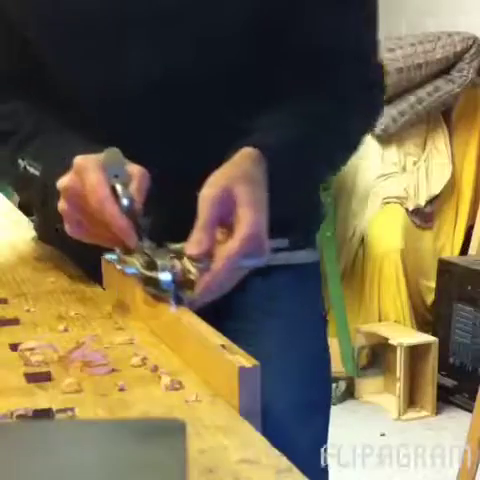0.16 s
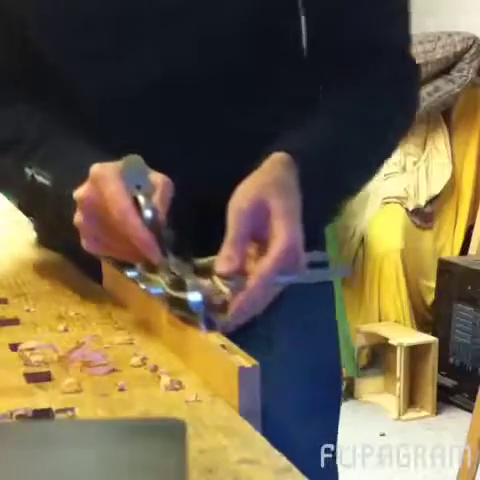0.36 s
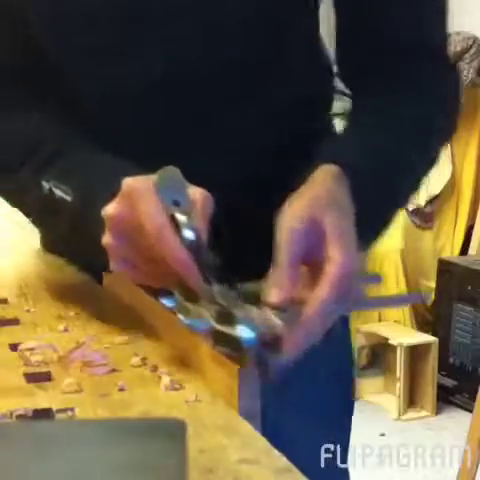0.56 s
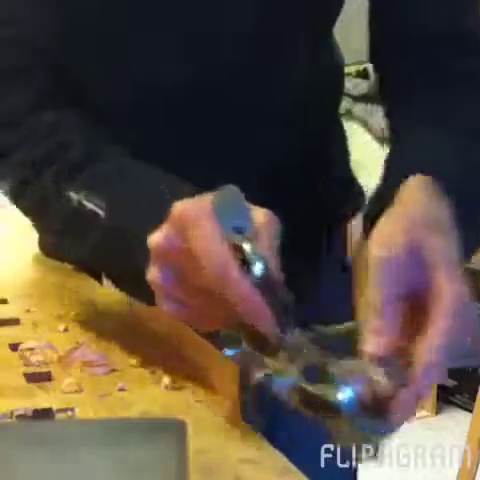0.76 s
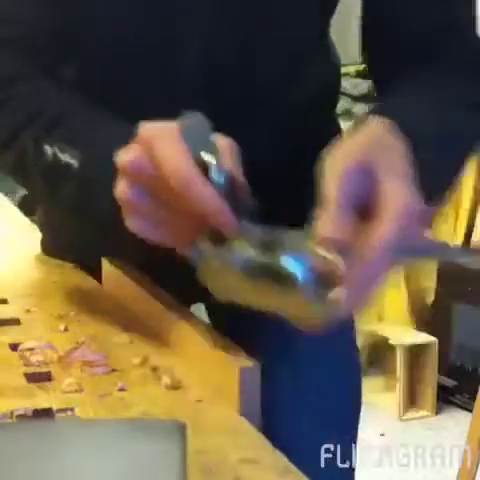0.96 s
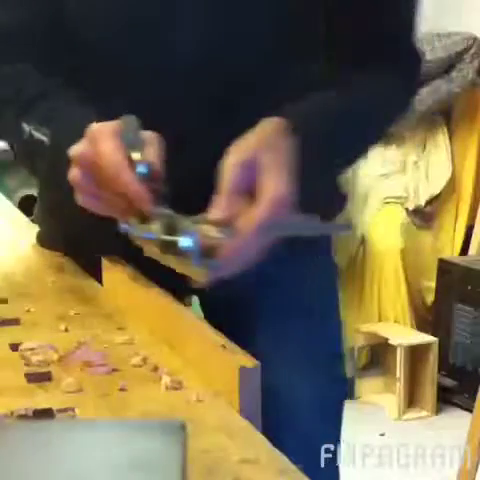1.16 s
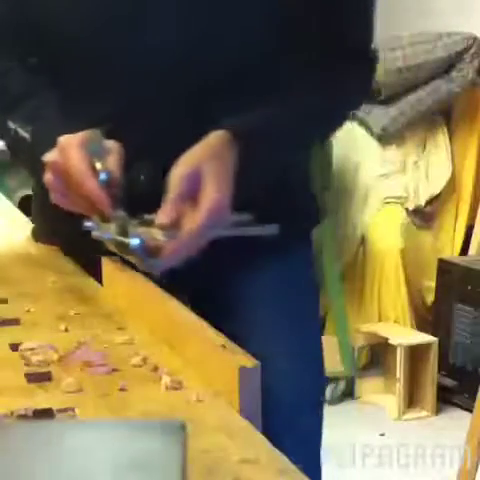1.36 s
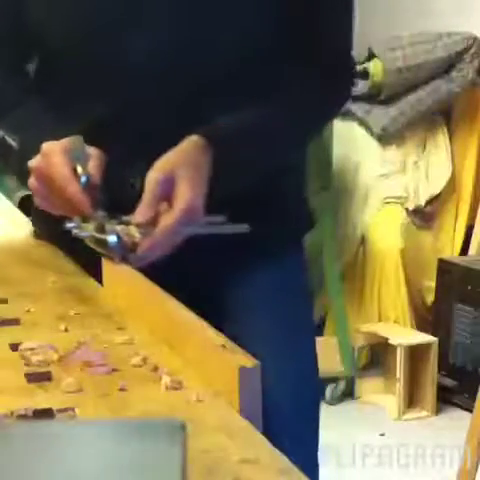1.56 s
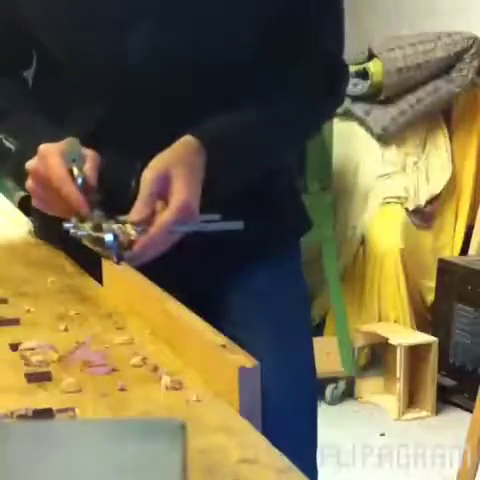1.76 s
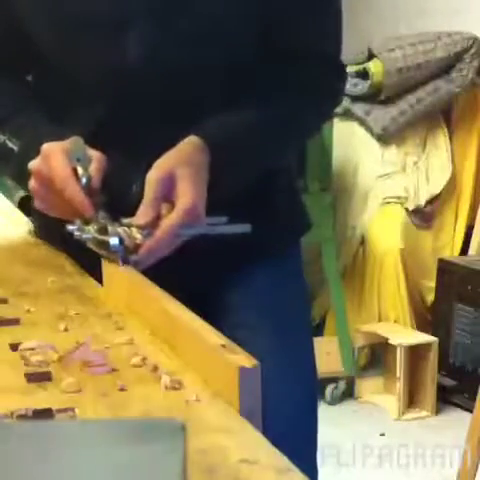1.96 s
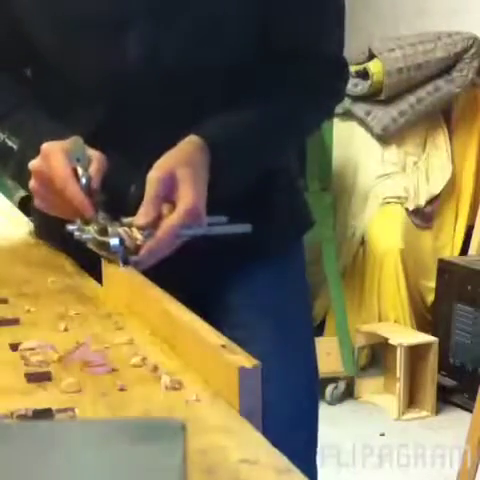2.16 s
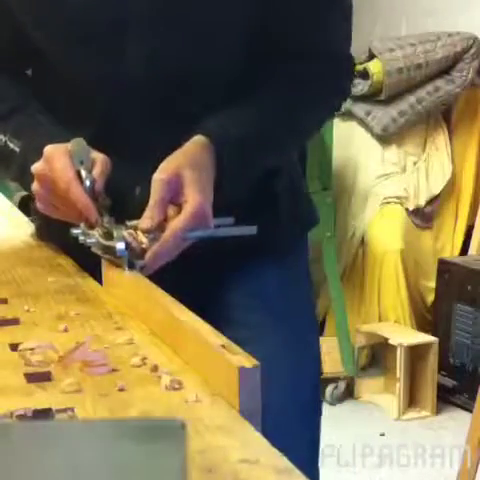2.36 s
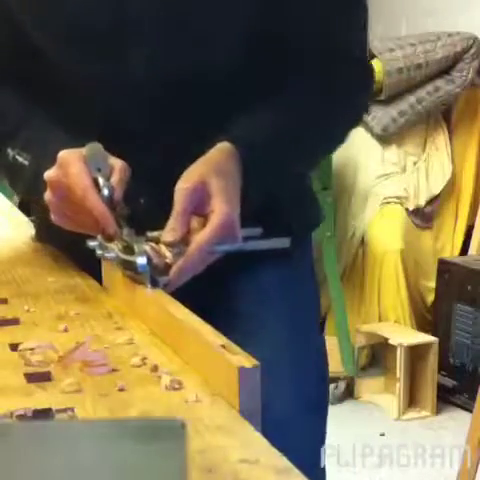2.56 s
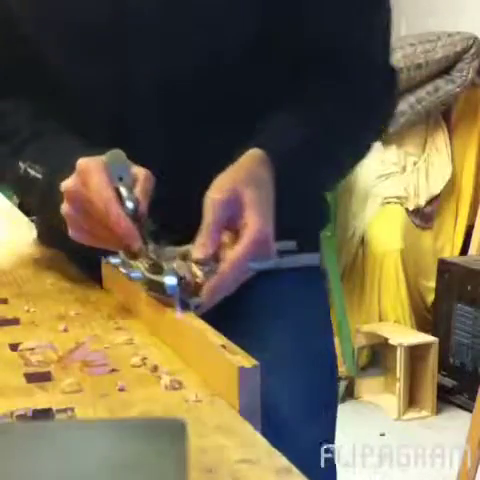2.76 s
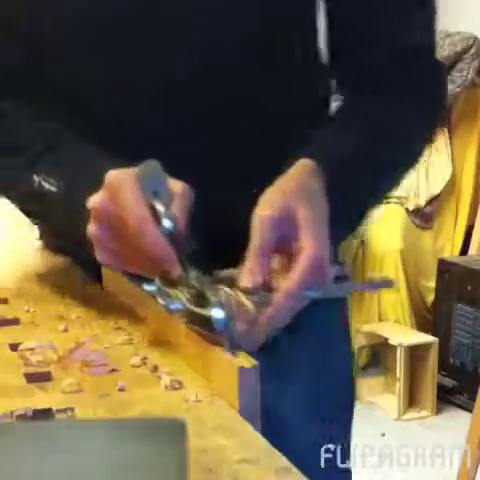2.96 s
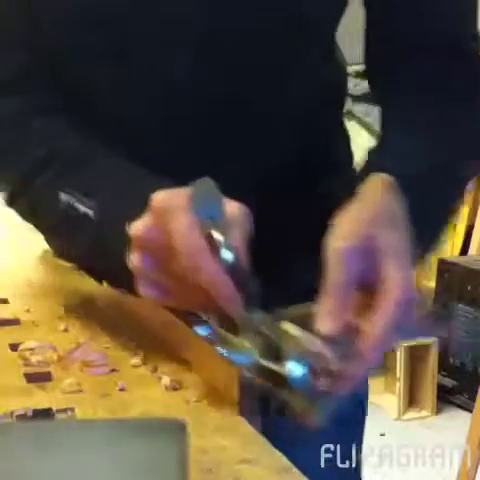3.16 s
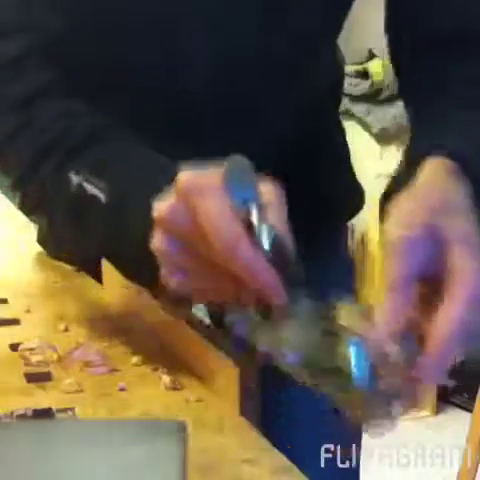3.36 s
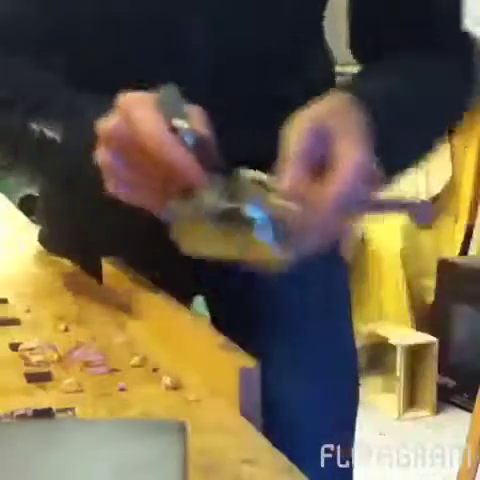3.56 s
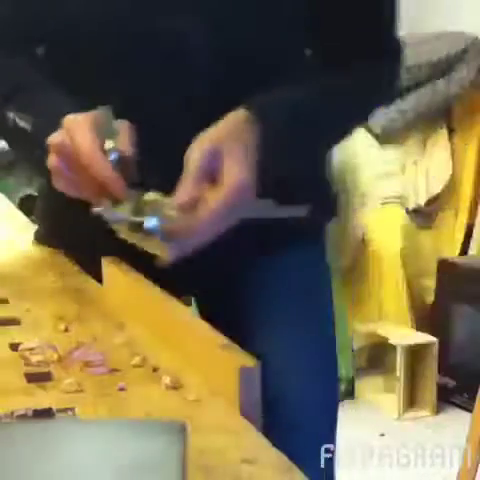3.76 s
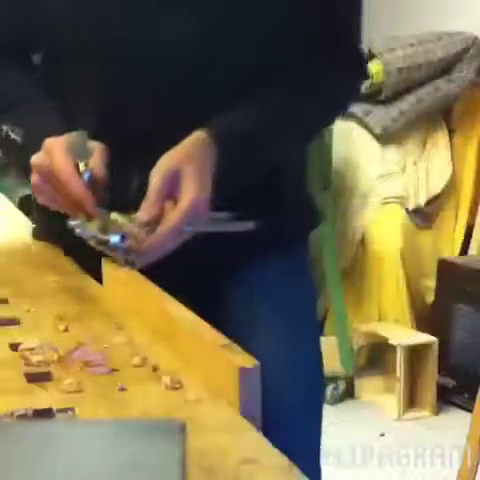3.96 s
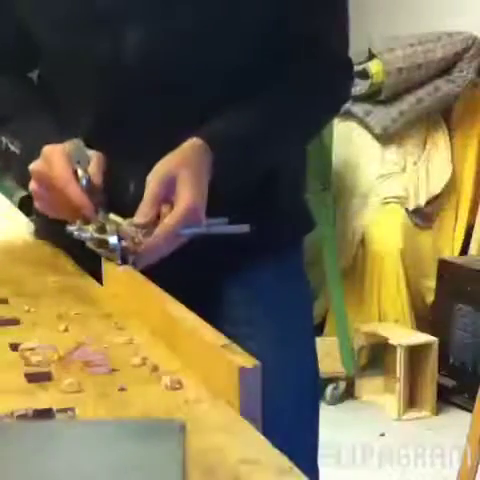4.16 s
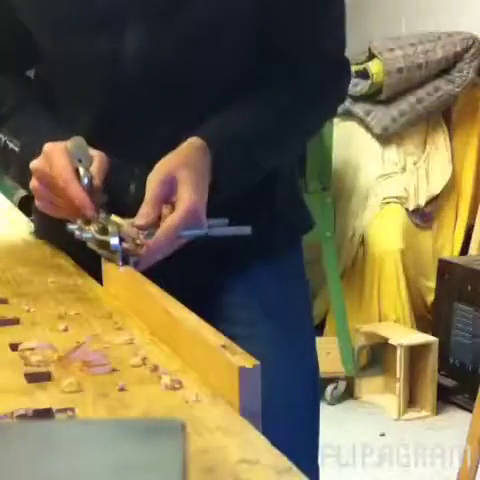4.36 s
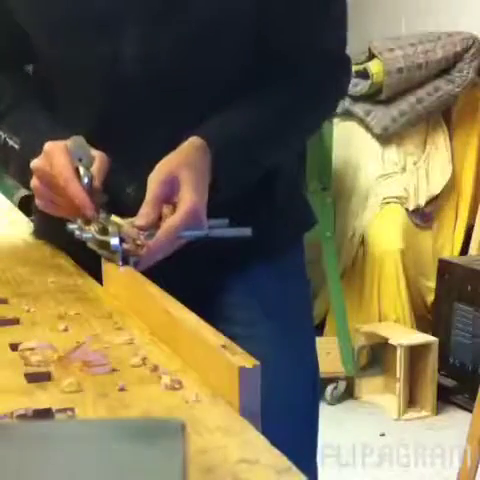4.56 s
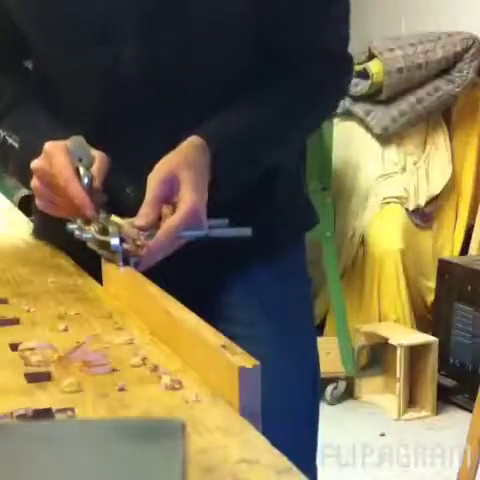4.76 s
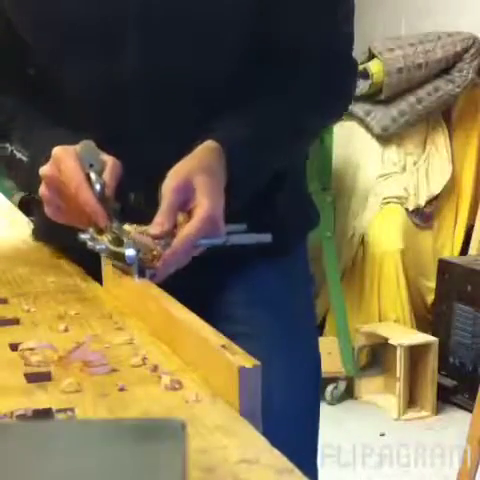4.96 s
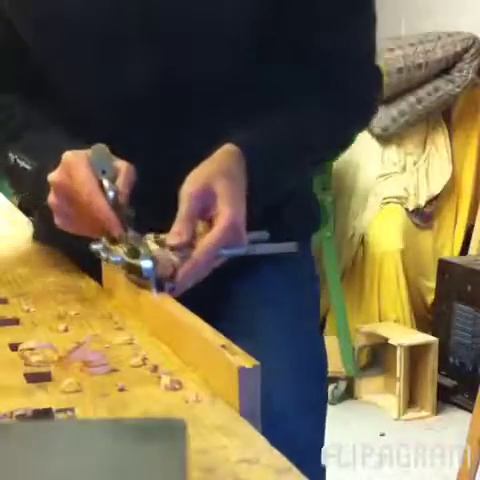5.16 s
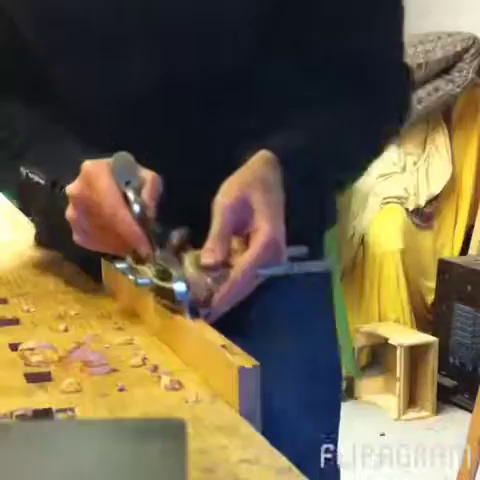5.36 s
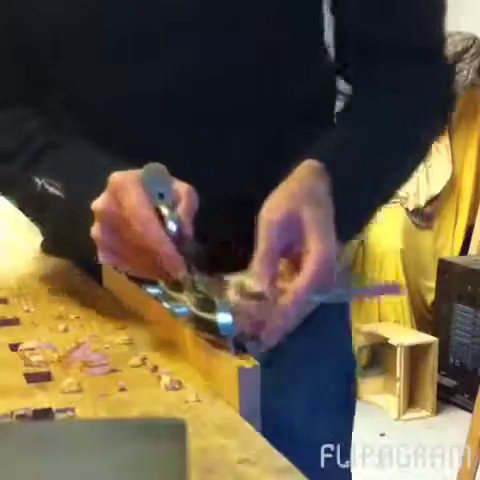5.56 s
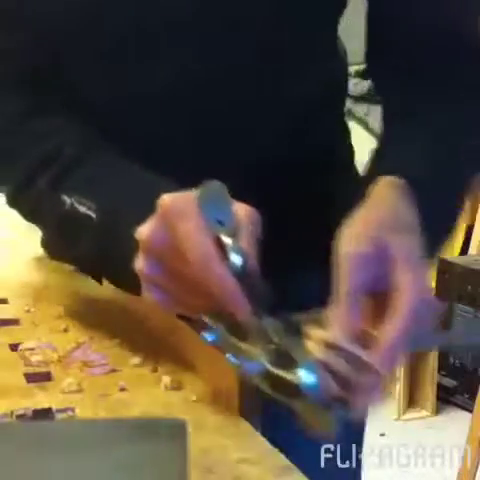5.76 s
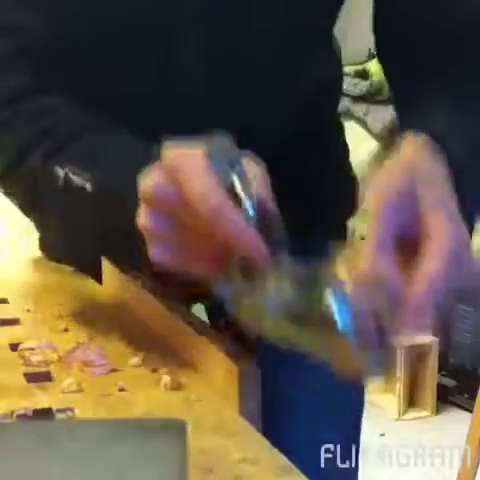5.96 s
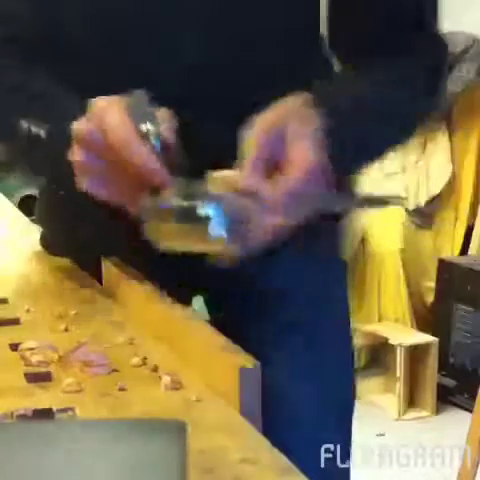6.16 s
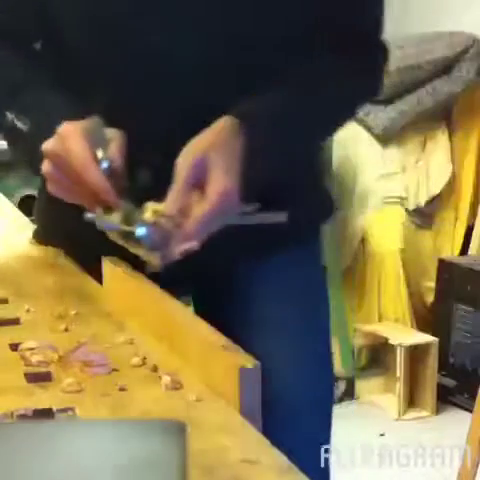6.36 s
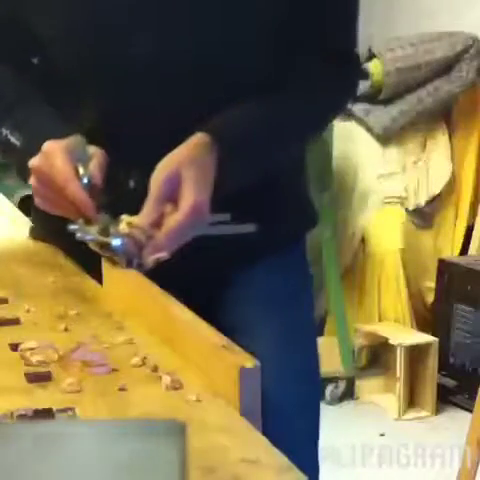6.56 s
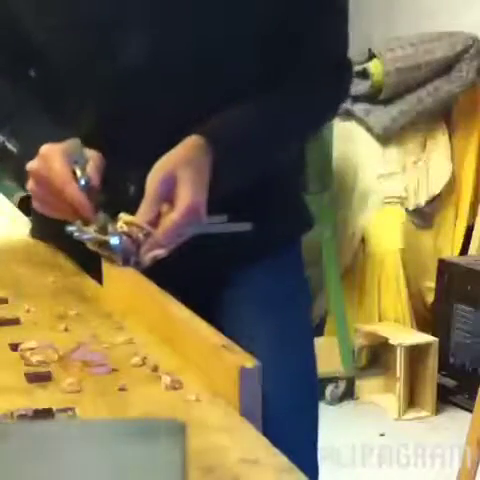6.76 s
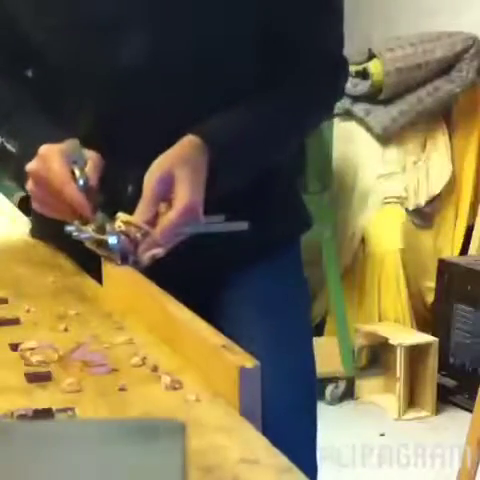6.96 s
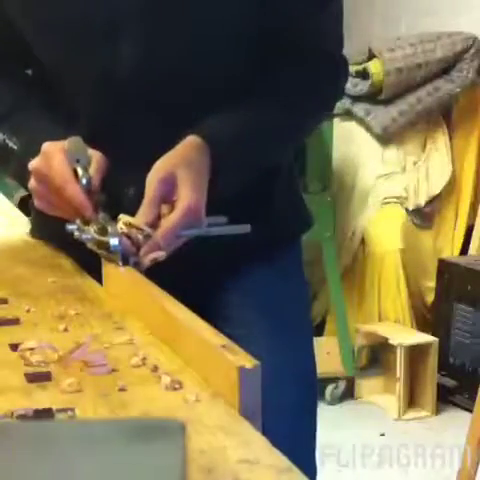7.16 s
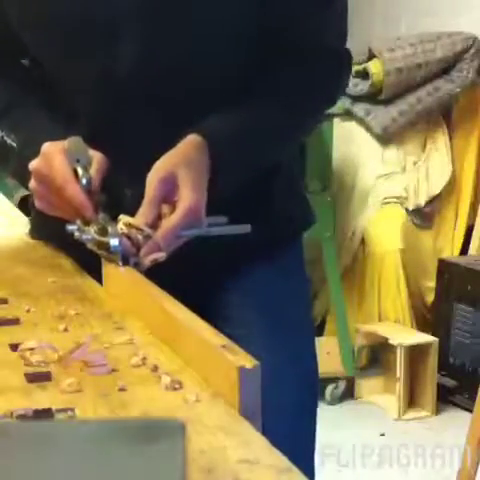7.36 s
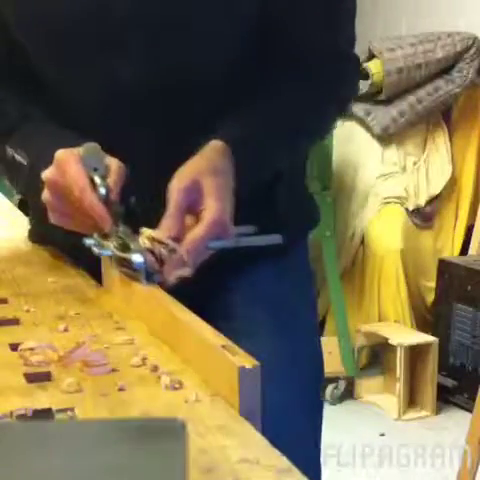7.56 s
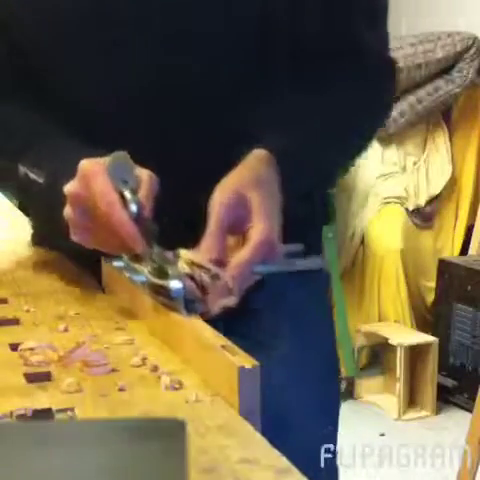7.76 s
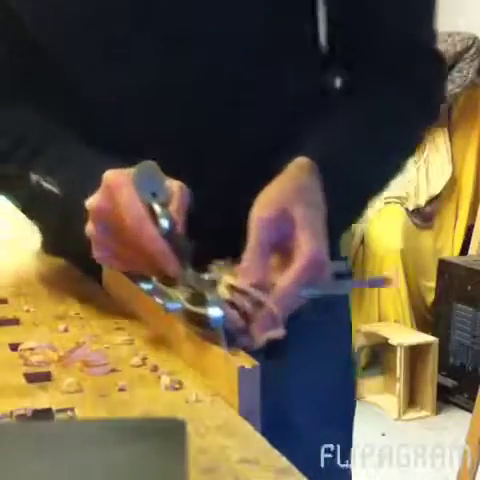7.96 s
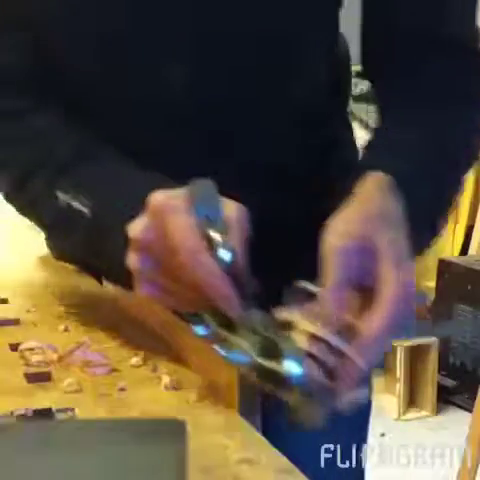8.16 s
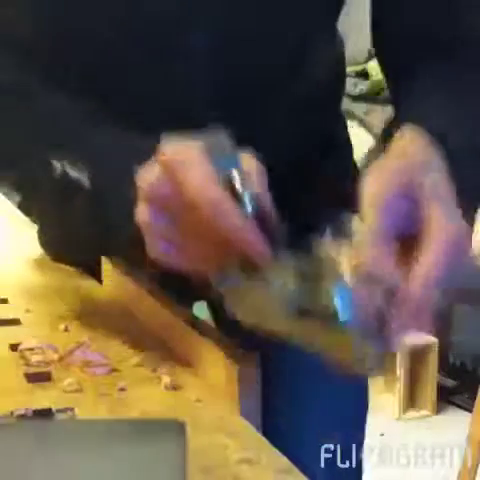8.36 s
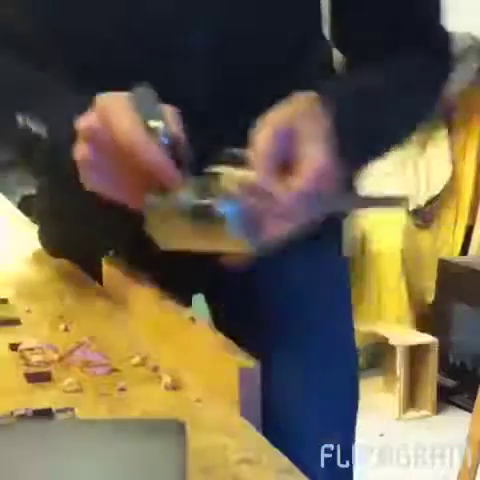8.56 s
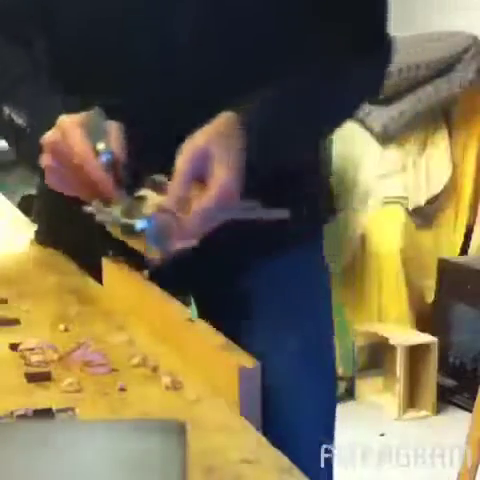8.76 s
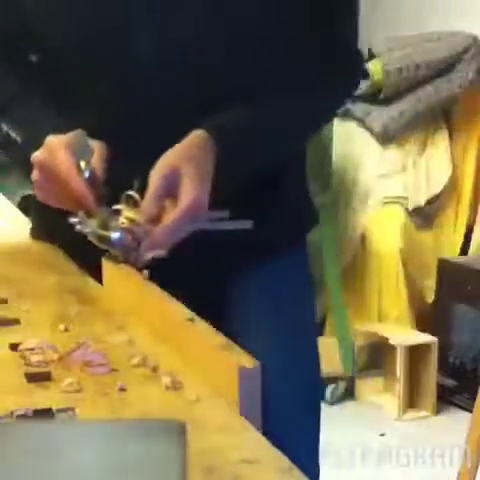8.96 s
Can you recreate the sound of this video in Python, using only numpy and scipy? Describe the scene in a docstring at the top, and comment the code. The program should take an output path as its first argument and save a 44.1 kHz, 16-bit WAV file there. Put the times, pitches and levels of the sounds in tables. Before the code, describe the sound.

A metal hand plane takes four shavings from a wooden board edge. Each stroke lasts about two-thirds of a second: a bite, coarse tearing with a hollow, wavering ring of the board, then a louder rise and crisp splintering. Between strokes come quiet gaps with metal-on-wood knocks, thuds and small rubs. Close microphone in a small, hard, lively workshop with faint hiss.

```python
"""A small live workshop: a metal plough plane takes four shavings from the edge of a board held at a workbench.
Each stroke: the sole rubs, the iron bites, filtered random snaps tear; the board's ring dips mid-board, then climbs.
Skips judder; brief tones squawk and swell. Between strokes the plane is carried back, set down with knocks
(short noisy blows into decaying modes) and shuffled into place (rubs, groans).
Echoes, a far-wall slap and a decaying tail form the room; steady shaped noise lies underneath."""
import sys
import numpy as np
from scipy import signal
from scipy.fft import rfft, irfft
from scipy.io import wavfile
from scipy.ndimage import uniform_filter1d

SR = 44100
rng = np.random.default_rng(int(sys.argv[2]) if len(sys.argv) > 2 else 0)


def bounce(signal):
    """Save signal as a 16-bit WAV file at the path given by the first command-line argument."""
    frames = np.transpose(np.atleast_2d(signal))
    limited = np.clip(frames, -1, 1)
    pcm = np.round(limited * 32767).astype(np.int16)
    wavfile.write(sys.argv[1], SR, pcm)


N = 396900
TAPS = 16384  # impulse response length, samples
HZ = np.fft.rfftfreq(TAPS, 1 / SR)
T = np.arange(N) / SR

# Event levels in all tables are ahead of each source's trim; spectra are relative.
# strokes: sole lands t/s, iron bites t/s, mid-board t/s, sole/dB, push/dB, bite/dB, tearing/dB,
# lift-off/dB, rough skirt of the low ring/dB
STROKES = [(-.15, 0.0406, .47, -37.5, -46, -36.5, -36.5, -46, -10),
           (2.196, 2.5212, 2.96, -47, -47, -36, -34, -50, -5),
           (4.862, 5.0617, 5.535, -36.5, -49, -28.5, -35, -47.5, -7.5),
           (7.453, 7.624, 7.98, -32.5, -48, -28.5, -35.5, -42.5, -6.5)]
# last fibres break off at the far end: t/s, level/dB
BREAKS = [(0.696, -45), (3.175, -42.5), (5.754, -42), (8.19, -39.5)]
# iron loses its shaving, skips along, digs in again: start/s, end/s, judder level/dB
SKIPS = [(2.55, 2.785, -26.5), (5.085, 5.32, -26.5)]
# spectrum of the sole rubbing on wood: f/Hz, level/dB
SOLE = [(100, -5), (250, 5), (450, 0.5), (650, -9), (900, 4), (1400, -3.5), (2500, -5), (5000, -9.5),
        (9000, -16), (15000, -18)]


def amp(db):
    """Decibels to gain."""
    return np.exp(np.asarray(db) * (np.log(10) / 20))


def evened(x):
    """Scales to rms 1."""
    return x / np.sqrt(np.mean(x ** 2) + 1e-20)


def ramp(x):
    """Clips to 0..1."""
    return np.clip(x, 0, 1)


def swell(s, half_s):
    """Gaussian hump of height 1 around time s."""
    return np.exp(-((T - s) / half_s) ** 2)


def read(points, hz):
    """Reads a table on a log-frequency axis."""
    f, value = np.transpose(points)
    return np.interp(np.log(hz + 1), np.log(f), value)


def wander(per_s):
    """Smooth low-passed noise of rms 1, cornering near per_s."""
    coarse = T[::10]
    hz = np.fft.rfftfreq(len(coarse), coarse[1])
    spectrum = rfft(rng.standard_normal(len(coarse))) / (1 + (hz / per_s) ** 4)
    return np.interp(T, coarse, evened(irfft(spectrum, len(coarse))))


def crackle(per_s, spread_db):
    """Tiny snaps at random moments, of uneven size and random sign; rms 1."""
    size = amp(spread_db * np.minimum(rng.exponential(1, N), 4)) * rng.choice([-1, 1], N)
    return evened(size * (rng.random(N) < per_s / SR))


def patchy(x, depth_db, size=5):
    """Every few fibres tear with their own colour: short spectral patches rise and fall; rms 1."""
    z = signal.stft(x, nperseg=512)[2]
    field = uniform_filter1d(rng.standard_normal(z.shape), size=size, axis=0)
    field = evened(uniform_filter1d(field, size=size, axis=1))
    return evened(signal.istft(z * amp(depth_db * field), nperseg=512)[1][:N])


def causal(db):
    """Minimum-phase impulse response of a gain curve."""
    log_gain = np.log(amp(np.concatenate([db, db[-2:0:-1]])))
    return irfft(np.exp(np.conj(signal.hilbert(log_gain)))[:len(db)])


def flattened(response, size):
    """Keeps a response's spread in time but lets all bands pass with near-equal energy."""
    power = uniform_filter1d(abs(rfft(response)) ** 2, size=size)
    return signal.fftconvolve(response, causal(-10 * np.log10(abs(power) + 1e-12)))[:TAPS]


def through_body(force, spectrum):
    """Colours a force and lets it ring the resonances of bench, board and plane."""
    # body resonances: f/Hz, width/Hz (before the width floor), lift/dB
    resonances = [(133, 30, 6.5), (187, 28, 14.5), (279, 21, 6), (325, 40, 11), (356.5, 32, -12.5),
                  (423.2, 47, 9.5), (512.5, 7.2, 12.5), (607, 95, 8.5), (626, 13, -1), (767.4, 102, 12),
                  (836, 48, 5.5), (983, 27, 7.5), (1134, 89, 4.5), (1534, 30, -6), (1510, 30, 0.5),
                  (1590, 29, 6), (1810, 120, 5), (2085, 55, 5.5), (2450, 210, 3.5), (2756, 50, 3.5),
                  (3040, 40, 0), (3625, 310, 4.5), (4260, 90, 3.5), (6050, 440, 5.5)]
    least = 1 / 42  # smallest width of a resonance / frequency, so none rings long
    lift_db = sum(db / (1 + (2 * (HZ - hz) / max(width, least * hz)) ** 2) for hz, width, db in resonances)
    response = causal(read(spectrum, HZ) + lift_db)
    return signal.oaconvolve(force, response / np.linalg.norm(response))[:N]


def resonate(x, hz, width_hz):
    """Steep-sided double-pole resonance following the curve hz; rms 1."""
    turn = np.exp(2j * np.pi * np.cumsum(hz * np.ones(N)) / SR)
    r = np.exp(-np.pi * width_hz / SR)
    return evened((turn * signal.lfilter([1], np.poly([r, r]), x / turn)).real)


def steadied(x, size):
    """Evens out a ring's strength by its running level."""
    return x / np.sqrt(abs(uniform_filter1d(x ** 2, size=size)) + 1e-9)


def blows(times, db, contact_s, spread=1.0, size=25):
    """Each blow is a first touch and its own brief chatter, so no two ring quite alike."""
    force = np.zeros(N + TAPS)
    for s, gain in zip(times, amp(db)):
        chatter = rng.standard_normal(TAPS) * np.exp(-T[:TAPS] / contact_s)
        chatter = spread * chatter / np.linalg.norm(chatter)
        chatter[0] += 1
        force[round(s * SR):][:TAPS] += gain * flattened(chatter, size=size)
    return force[:N]


def struck(force, modes):
    """A force sets dying modes ringing; dB is each mode's share of the energy."""
    t = T[:TAPS]
    ring = np.zeros(TAPS)
    for k, (hz, db, t60) in enumerate(modes):
        ring += amp(db - 60 * t / t60) / np.sqrt(t60) * np.sin(2 * np.pi * hz * t) * (-1) ** k
    # small parts radiate no bass
    ring = signal.sosfilt(signal.butter(2, modes[0][0] / 2, "high", fs=SR, output="sos"), ring)
    return signal.oaconvolve(force, ring / np.linalg.norm(ring))[:N]


def brief_tones(table, jitter, rough_db, per_s, glide):
    """Gaussian tone bursts, uneven in pitch and strength; rows: t/s, half length/s, f/Hz, level/dB."""
    turns = np.cumsum(1 + jitter * wander(per_s)) / SR
    out = np.zeros(N)
    for s, half_s, hz, db in table:
        near = slice(*np.searchsorted(T, [s - 3 * half_s, s + 3 * half_s]))
        age = T[near] - s
        tone = np.sin(2 * np.pi * hz * (turns[near] + glide[near] * age ** 2 / 2))
        out[near] += amp(db) * np.exp(-(age / half_s) ** 2) * tone
    return np.sqrt(2) * out * evened(amp(rough_db * wander(per_s)))


def nearest(table):
    """At every moment, the columns of the row closest in time, split midway between first columns."""
    rows = np.array(table)
    return rows[np.searchsorted((rows[1:, 0] + rows[:-1, 0]) / 2, T)].T


def stroke(column):
    """At every moment, one column of the latest stroke to land."""
    names = ["lands_s", "bites_s", "middle_s", "sole_db", "push_db", "bite_db", "tearing_db", "lift_db", "skirt_db"]
    rows = np.array(STROKES)
    return rows[np.searchsorted(rows[1:, 0], T), names.index(column)]


def since_bite():
    """Seconds since the iron bit; negative while the sole only slides."""
    return T - stroke("bites_s")


def until_end():
    """Seconds until the cut ends; negative while the plane is carried back."""
    ends_s = np.array(BREAKS)[:, 0] + 0.05  # iron leaves the wood this long after the break
    return ends_s[np.searchsorted(np.array(STROKES)[1:, 0], T)] - T


def skip_progress():
    """Runs from 0 to 1 through each skip, and beyond outside it."""
    start, end, _ = nearest(SKIPS)
    return (T - start) / (end - start)


def engaged(skip_db, attack_s=0.015, release_s=0.032):
    """Gain that is open while the iron is in the wood and sinks by skip_db in a skip."""
    thin_out, dig_in = 0.37, 0.42  # shares of the skip
    u = skip_progress()
    lost = ramp(np.minimum(u / thin_out, (1 - u) / dig_in))
    return ramp(since_bite() / attack_s) * ramp(until_end() / release_s) * amp(skip_db * lost)


def effort(bite_db, settle_s, ease_db, end_db, end_from_s, end_rise_s,
           ease_s=0.14, slack_db=-6.0, slack_before_s=0.059, slack_s=0.028):
    """A cut bites, settles, runs easiest mid-board, grows louder near the end, slackens before the break."""
    left = until_end()
    start = bite_db * np.exp(-np.maximum(since_bite(), 0) / settle_s)
    middle = ease_db * swell(stroke("middle_s"), ease_s)
    slack = slack_db * np.exp(-((left - slack_before_s) / slack_s) ** 2)
    end = end_db * ramp((end_from_s - left) / end_rise_s)
    return amp(stroke("tearing_db") + start + middle + slack + end)


def cutting(clump_db=3.0, grain_db=0.7):
    """The iron snaps fibres in clumps; the shaving fizzes out and the board rings under the moving plane."""
    # spectra of torn fibres and of the fizzing shaving: f/Hz, level/dB
    tear_spectrum = [(100, -65.5), (220, -2.5), (320, 1), (600, -3.5), (1000, 2), (1400, 3.5), (2300, 0),
                     (3500, -7.5), (5000, -13), (6500, -20), (9000, -28), (15000, -37)]
    fizz_spectrum = [(60, -30), (400, -30), (1500, -5), (4000, 2), (7000, -1), (9000, -2.5), (12000, -3),
                     (14000, -3), (15200, -1)]
    clumps = amp(clump_db * wander(per_s=320) + grain_db * wander(per_s=13.0))
    snaps = patchy(crackle(per_s=5500, spread_db=2.5) * clumps, depth_db=2.0)
    fine_snaps = patchy(crackle(per_s=12000, spread_db=2.5) * clumps, depth_db=3.5)
    tearing = engaged(skip_db=-18.5) * effort(
        bite_db=5.5, settle_s=0.059, ease_db=-3.5, end_db=4.0, end_from_s=0.28, end_rise_s=0.068)
    fizzing = engaged(skip_db=-11.5) * effort(
        bite_db=-0.5, settle_s=0.23, ease_db=-1.5, end_db=7.0, end_from_s=0.29, end_rise_s=0.25)
    tear = amp(0.85) * through_body(snaps * tearing, tear_spectrum)
    fizz = amp(-11.0) * through_body(fine_snaps * fizzing, fizz_spectrum)
    shaking = through_body(snaps, tear_spectrum)
    rings = upper_ring(shaking) + low_ring(shaking) + far_end(shaking)
    return tear + fizz + rings + squawks_and_swells() + breaking()


def upper_ring(shaking, start_hz=1010, end_hz=810, sink_s=0.47):
    """The board's upper ring sinks in pitch as the plane moves in from the near end."""
    hz = start_hz + (end_hz - start_hz) * ramp(since_bite() / sink_s)
    ring = steadied(resonate(shaking, hz, width_hz=444), size=1500)
    return amp(-40.5 - 2.3 * swell(stroke("middle_s"), 0.046)) * engaged(skip_db=-4.5) * ring


def low_ring(shaking):
    """The plane loads the board most at its middle, so the ring dips there: singing core, rough skirt."""
    # one curve a stroke: t/s, f/Hz, level/dB
    curves = [
        [(.295, 590, -42), (.334, 546, -24), (.358, 519, -26.5), (.38, 500.3, -23), (.41, 513.5, -29.5),
         (.447, 525.3, -25), (.485, 495, -19.5), (.527, 496, -22.5), (.548, 473, -49), (.59, 503, -47),
         (.64, 603, -50)],
        [(2.905, 582.5, -42), (2.945, 532, -24.5), (2.98, 544, -37), (3.025, 628, -34), (3.06, 669, -32.5),
         (3.11, 780, -47)],
        [(5.44, 595, -33), (5.49, 545, -27.5), (5.545, 525.2, -20.5), (5.575, 554.3, -28), (5.63, 576.5, -29),
         (5.66, 696, -45), (5.71, 764, -40)],
        [(7.85, 574.7, -40), (7.925, 526, -28.5), (7.965, 515.3, -21), (8.01, 520, -24), (8.035, 600, -47),
         (8.075, 737, -49), (8.13, 815, -39)],
    ]
    s, hz, db = np.concatenate(curves).T
    hz = np.interp(T, s, hz)
    fade_s = 0.025
    sounding = sum(ramp((T - c[0][0]) / fade_s) * ramp((c[-1][0] - T) / fade_s) for c in curves)
    core = evened(np.sin(2 * np.pi * np.cumsum(hz * (1 + 0.04 * wander(per_s=105))) / SR))
    skirt = steadied(resonate(shaking, hz, width_hz=277), size=1100)
    share = amp(stroke("skirt_db"))
    ring = (core + share * skirt) / np.sqrt(1 + share ** 2) * amp(3.7 * wander(per_s=36))
    return amp(np.interp(T, s, db) - 2.0) * sounding * ring


def far_end(shaking, ragged_db=-4.0):
    """The short length left ahead of the iron rings, unevenly in pitch and level, until the cut ends."""
    # ring ahead of the iron: time before the cut ends t/s, f/Hz, level/dB
    curve = [(0, 1740, -56), (.04, 1720, -46), (.105, 1700, -55), (.16, 1550, -68), (.194, 1250, -52),
             (0.228, 1140, -36.5)]
    left_s = until_end()
    before_s, hz, db = np.transpose(curve)
    gain = amp(np.interp(left_s, before_s, db, left=-120, right=-120))
    hz = np.interp(left_s, before_s, hz) * (1 + 0.04 * wander(per_s=15))
    ring = steadied(resonate(shaking, hz, width_hz=240), size=900)
    return gain * amp(ragged_db * wander(per_s=34)) * ring


def squawks_and_swells(glide_per_s=0.86):
    """Squawks of the catching iron and swells of the board's ring: falling before mid-board, then rising."""
    # brief tones: t/s, half length/s, f/Hz, level/dB
    tones = [(.075, 0.013, 790, -31), (.145, 0.017, 840, -32.5), (.162, 0.024, 602, -34.5),
             (.558, 0.0081, 1250, -31.5), (.63, 0.014, 1690, -36.5), (.68, 0.051, 1720, -43),
             (.73, 0.018, 809, -45), (2.548, 0.014, 780, -26.5), (2.6, 0.017, 785, -32.5),
             (2.87, 0.048, 962, -35), (2.928, 0.018, 796.5, -24.5), (3.062, 0.023, 1555, -34),
             (3.14, 0.0091, 825, -29), (3.185, 0.025, 1700, -37.5), (3.203, 0.0094, 840, -31),
             (5.1, 0.026, 785, -32), (5.325, 0.01, 878, -32), (5.425, .02, 754, -33),
             (5.632, 0.029, 1534, -33), (5.665, 0.02, 760, -31), (5.77, 0.0097, 1713, -44),
             (7.675, 0.027, 1025, -34.5), (7.775, .025, 882, -41), (8.06, 0.019, 1445, -34.5),
             (8.125, 0.019, 1665, -29.5), (8.132, 0.017, 853, -29.5), (8.235, 0.02, 860, -33)]
    glide = glide_per_s * np.sign(T - stroke("middle_s"))
    return amp(1.5) * brief_tones(tones, jitter=0.055, rough_db=2.5, per_s=225, glide=glide)


def breaking(length_s=0.034, entry_s=0.013, entry_db=-11.5):
    """First fibres crack as the iron enters; the last ones splinter in a short, crisp burst."""
    # splintering spectrum: f/Hz, level/dB
    splinter = [(500, -56), (1500, -5.5), (2600, 4.5), (4000, 2.5), (5500, -5), (8000, -9.5), (15000, -22)]
    s, db = nearest(BREAKS)
    age, since = T - s, since_bite()
    end = amp(db) * (age >= 0) * np.exp(-abs(age) / length_s)
    entry = amp(stroke("bite_db") + entry_db) * (since >= 0) * np.exp(-abs(since) / entry_s)
    gain = amp(12.5) * end + amp(10.5) * entry
    return through_body(crackle(per_s=4000, spread_db=-1.0) * gain, splinter)


def rasping(attack_s=0.0027, clump_db=3.5):
    """Coarse grain or a graze snaps in quick bunches: throaty rasp from the wood, bright from the shaving."""
    # rasps: start t/s, length/s, throaty level/dB, bright level/dB
    rasps = [(0.039, 0.057, -30.5, -32), (0.09, 0.055, -59, -39.5), (0.621, 0.07, -49, -35.5),
             (0.875, 0.07, -66, -61), (1.598, 0.05, -71, -66), (2.515, 0.12, -53, -44),
             (2.798, 0.17, -41, -43), (4.505, 0.027, -68, -82), (5.059, 0.11, -41.5, -42),
             (5.331, 0.14, -48, -43), (5.61, 0.086, -44, -41), (6.87, 0.09, -71, -78),
             (7.05, 0.031, -70, -80), (7.625, 0.064, -32, -36), (7.785, 0.11, -45, -43.5)]
    # throaty and bright spectra: f/Hz, level/dB
    throaty = [(300, -47), (900, -2), (1300, 5), (1900, 0), (2600, -11.5), (5000, -31), (15000, -48)]
    bright = [(500, -35), (1600, -3), (2400, 7), (3700, 3.5), (5000, -4.5), (6500, -9), (9000, -15),
              (15000, -15)]
    low, high = np.zeros((2, N))
    for s, length_s, low_db, high_db in rasps:
        near = slice(*np.searchsorted(T, [s, s + 2 * length_s]))
        age = T[near] - s
        shape = ramp(age / attack_s) * np.exp(-(age / length_s) ** 4)
        low[near] += amp(low_db) * shape
        high[near] += amp(high_db) * shape
    snaps = evened(crackle(per_s=3200, spread_db=5.5) * amp(clump_db * wander(per_s=780)))
    return amp(0.5) * through_body(snaps * low, throaty) + amp(-0.5) * through_body(snaps * high, bright)


def judder(jitter=0.22, width_hz=190, db=-6.0, slow_hz=205, fast_hz=440, loudest=0.65, spread=0.55):
    """The iron sticks and slips unevenly, faster as the plane gathers speed."""
    u = skip_progress()
    rate_hz = slow_hz + (fast_hz - slow_hz) * ramp(u) ** 3
    turns = np.floor(np.cumsum(rate_hz * (1 + jitter * wander(per_s=156))) / SR)
    slips = np.diff(turns, prepend=0) * amp(6.6 * wander(per_s=113))
    slips = signal.sosfilt(signal.butter(4, 170, "high", fs=SR, output="sos"), slips)
    envelope = np.exp(-((u - loudest) / spread) ** 2)  # in shares of the skip
    return amp(db + nearest(SKIPS)[2]) * resonate(slips, rate_hz, width_hz) * envelope


def sliding(lean_s=0.11, relax_db_per_s=38, steady_db=-59, lift_s=0.075, calm_db_per_s=95,
            trail_db=-45, trail_db_per_s=65):
    """The sole rubs until the bite; the push shakes the bench, relaxes, shakes it again at run-off."""
    # spectra of the brushing shaving and the shaken bench: f/Hz, level/dB
    trail_spectrum = [(100, -32), (200, -14), (450, 4.5), (900, 0), (1700, -2), (2500, -8), (4000, -8),
                      (9000, -21), (15000, -23)]
    rumble_spectrum = [(25, -50), (60, -37), (95, -30), (130, -9), (185, 4), (260, -3.5), (400, -5.5),
                       (700, -18.5), (1500, -53), (4000, -64)]
    since, left = since_bite(), until_end()
    lean = ramp((T - stroke("lands_s")) / lean_s) ** 2
    rubbing = lean * (since < 0) * amp(stroke("sole_db"))
    push = amp(stroke("push_db") - relax_db_per_s * np.maximum(since, 0))
    pushing = lean * (left > 0) * (push + amp(steady_db))  # steady_db is ahead of the shake trim
    lifting = ramp(1 - left / lift_s) * amp(stroke("lift_db") - calm_db_per_s * np.maximum(-left, 0))
    trailing = (left < 0) * amp(trail_db - trail_db_per_s * abs(left))  # loose shaving brushes off the board
    rub = through_body(crackle(per_s=6600, spread_db=5) * rubbing * amp(3.2 * wander(per_s=10)), SOLE)
    brush = through_body(patchy(crackle(per_s=3400, spread_db=3.0), depth_db=5.0) * trailing, trail_spectrum)
    shake = steadied(through_body(crackle(per_s=900, spread_db=0.5), rumble_spectrum), size=1300)
    shake = shake * (pushing + lifting) * amp(3.0 * wander(per_s=13.5))
    return amp(-3.5) * rub + brush + amp(4.5) * shake


def contacts():
    """All knocks and bites: their times, then the dB of thud, wood, clink, clack, tick, rod and board."""
    # plane lifted or set down, or the iron biting: t/s, then levels thud/dB, wood/dB, clink/dB, clack/dB,
    # tick/dB, rod/dB, board's low ring/dB
    touches = [(1.5459, -45.5, -42.5, -58, -75, -63, -90, -42),
               (1.666, -66, -41.5, -42.5, -74, -79, -90, -60),
               (1.6798, -39.5, -32.5, -35.5, -46, -50.5, -46, -45),
               (1.701, -49, -38.5, -51, -59, -65, -62, -59),
               (2.047, -36.5, -40.5, -49, -51, -40.5, -72, -50),
               (2.066, -42, -51, -48.5, -60, -66, -85, -68),
               (4.0353, -41.5, -41.5, -43, -48, -63, -58, -38),
               (4.0995, -30, -27, -30.5, -36.5, -41, -43, -38),
               (4.122, -47, -33.5, -32.5, -43, -46.5, -59, -27.5),
               (4.3468, -38, -45, -71, -72, -85, -90, -62), (4.363, -49, -61, -62, -65, -75, -92, -65),
               (6.6415, -39, -35.5, -40.5, -41.5, -76, -72, -42),
               (6.876, -55.5, -54, -70, -59, -82, -90, -70), (7.136, -41, -51, -52, -65, -62, -83, -73),
               (7.152, -48, -50, -62, -72, -72, -90, -64), (2.522, -50, -46, -50, -58, -40, -31.5, -60),
               (7.627, -46, -53, -48, -28.5, -48, -59, -58)]
    # the bite as a knock, same seven levels/dB, relative to the stroke's bite level
    bite_knock = (-30, -12, -35, -0.5, -30, -23, -8)
    bites = [(s, *(bite_db + np.array(bite_knock))) for _, s, _, _, _, bite_db, *_ in STROKES]
    return np.transpose(touches + bites)


def knocks():
    """Metal meets wood: contact tick, plane clink, board knock, bench thud; faint rattles when carried."""
    # rattles as the plane is carried back: t/s, level/dB
    rattles = [(3.582, -60.5), (3.659, -60), (3.726, -65), (8.541, -63.5), (8.595, -65)]
    # modes of plane, wood and whole board: f/Hz, level/dB, t60/s
    clink_modes = [(1257, 0.5, 0.04), (1386, 3, 0.02), (1463, 3.5, 0.038), (1681, 6, 0.03),
                   (1736, 1.5, 0.031), (1826, 1.5, 0.039), (1965, 2.5, 0.028), (2170, 2.5, 0.025),
                   (2220, 2, 0.037)]
    wood_modes = [(580, -13, 0.046), (724, 1, 0.078), (806, 6, 0.059), (852, 6, 0.024), (970, -3, 0.04),
                  (1048, -1.5, 0.026), (1118, -0.5, 0.025)]
    board_modes = [(515, 1.5, 0.069), (540, -11.5, 0.043)]
    # spectra of blow, thud, tick and rattle: f/Hz, level/dB
    blow_spectrum = [(60, -40), (150, -40), (400, 6), (800, -11), (1200, -24), (2200, -20), (3000, -19),
                     (5000, -43), (9000, -56)]
    thud_spectrum = [(30, -66), (90, -28), (140, 0), (190, 8.5), (300, 5), (500, -2), (800, -20.5),
                     (1500, -19.5), (4000, -39)]
    tick_spectrum = [(1500, 0), (3500, 8.5), (6000, 3), (7800, -0.5), (9700, 2), (15000, -10)]
    rattle_spectrum = [(150, -10), (400, -13), (570, 2), (760, -29), (1100, -15.5), (4000, -29)]
    s, thud_db, wood_db, clink_db, _, tick_db, _, board_db = contacts()
    hard = blows(s, clink_db, contact_s=0.00057, spread=0.12, size=150)
    clink = amp(21.0) * through_body(hard, blow_spectrum) + amp(22.0) * struck(hard, clink_modes)
    wood = amp(24.5) * struck(blows(s, wood_db, contact_s=0.014, spread=0.83, size=100), wood_modes)
    board = amp(26.5) * struck(blows(s, board_db, contact_s=0.0075, spread=0.88, size=60), board_modes)
    thud = amp(31.0) * through_body(blows(s, thud_db, contact_s=0.012, spread=3.4), thud_spectrum)
    tick = amp(23.5) * through_body(blows(s, tick_db, contact_s=0.0068, spread=11.0), tick_spectrum)
    s, rattle_db = np.transpose(rattles)
    rattle = amp(37.5) * through_body(blows(s, rattle_db, contact_s=0.0015, spread=0.63), rattle_spectrum)
    return clink + wood + board + thud + tick + rattle


def clacks():
    """The plane's fittings clack, short and dry, at each contact; its steel fence rods may ring on."""
    # modes of fittings and rods: f/Hz, level/dB, t60/s
    clack_modes = [(2300, 14.5, 0.033), (2500, 14, 0.022), (2650, 11, 0.02), (2830, -3.5, 0.018),
                   (3170, 4, 0.027), (3540, -10, 0.066)]
    rod_modes = [(3260, -2, 0.067), (5600, -16, 0.1), (6185, -15, 0.096)]
    s, *_, clack_db, _, rod_db, _ = contacts()
    clack = amp(21.5) * struck(blows(s, clack_db, contact_s=0.001, spread=0.285), clack_modes)
    rod = amp(23.5) * struck(blows(s, rod_db, contact_s=0.001, spread=0.1), rod_modes)
    return clack + rod


def nudging():
    """A small shift of the plane in the hands or on the board rubs the wood and draws a faint groan."""
    # nudges: t/s, half length/s, f/Hz, groan level/dB, rub level/dB
    nudges = [(2.008, 0.05, 188, -68, -45), (2.215, 0.075, 328.7, -49, -41), (2.345, 0.024, 152, -63, -59),
              (3.465, 0.13, 182, -51, -74), (3.75, 0.041, 506, -57, -74), (4.535, 0.031, 263, -46.5, -55),
              (5.02, 0.019, 442, -29, -54), (6.92, 0.054, 955, -58, -69), (7.295, 0.035, 248.3, -45.5, -64),
              (7.532, 0.024, 248, -42, -44), (8.36, 0.014, 1170, -41.5, -63),
              (8.631, 0.052, 197, -56.5, -70)]
    s, half_s, hz, groan_db, rub_db = nearest(nudges)
    rub = through_body(crackle(per_s=750, spread_db=3.5), SOLE)
    groan = steadied(resonate(rub, hz, width_hz=370), size=1300)
    return swell(s, half_s) * (amp(groan_db - 3.5) * groan + amp(rub_db - 17.0) * rub)


def leaning():
    """Weight on the plane makes the bench hum briefly at its lowest resonance."""
    # leans: t/s, half length/s, f/Hz, level/dB
    leans = [(1.618, 0.03, 183.3, -53), (3.235, 0.027, 184, -51), (4.575, 0.025, 180.7, -69),
             (4.972, 0.026, 183.8, -43), (6.985, 0.02, 185.5, -52)]
    return amp(9.0) * brief_tones(leans, jitter=0.0563, rough_db=-0.5, per_s=68.6, glide=np.zeros(N))


def workshop(x, tail_db=6.0, build_s=0.0017, echo_db=0.0, wall_db=-4.0):
    """Direct sound, near echoes, a dull scattered far-wall slap, a tail dying mostly faster in the treble."""
    # decay: f/Hz, t60/s
    room_t60 = [(150, 0.55), (500, 0.38), (1500, 0.43), (3500, 0.35), (7000, 0.3), (14000, 0.25)]
    # early reflections: delay t/s, gain (before echo_db)
    echoes = [(.0031, 1), (.0074, -1.6), (0.0124, 0.17), (0.021, -0.42), (0.0232, 0.13), (.0275, 0.045)]
    wall_s, wall_spread_s, wall_hz = 0.022, 0.0025, 1550  # slap is dull above wall_hz
    hz, when, z = signal.stft(rng.standard_normal(TAPS), SR, nperseg=256)
    slap = amp(wall_db) * np.exp(-((when - wall_s) / wall_spread_s) ** 2) / (1 + (hz[:, None] / wall_hz) ** 2)
    decay = amp(-60 * when / read(room_t60, hz)[:, None])
    tail = signal.istft(z * (slap + decay), SR, nperseg=256)[1][:TAPS]
    tail = tail * (1 - np.exp(-T[:TAPS] / build_s))
    response = amp(tail_db) * tail / np.linalg.norm(tail)
    response[0] += 1
    for delay_s, gain in echoes:
        response[round(delay_s * SR)] += amp(echo_db) * gain
    return signal.oaconvolve(x, flattened(response, size=11))[:N]


def travelling(x, travel_s=0.88):
    """The room answers differently as the plane moves from near to far end: two responses crossfade."""
    along = ramp(since_bite() / travel_s)
    return workshop(x * (1 - along)) + workshop(x * along)


def quiet():
    """Steady room tone and microphone hiss: shaped Gaussian noise."""
    # background spectrum: f/Hz, level/dB
    tone_spectrum = [(15, -18), (25, -16), (64, -10), (181, 9.5), (856, -2.5), (1310, -3.5), (1670, -4.5),
                     (2300, -3), (2700, -5.5), (2930, -6.5), (3350, -6), (7680, -9), (8320, -10),
                     (15000, -12)]
    colour = amp(read(tone_spectrum, np.fft.rfftfreq(N, 1 / SR)))
    return amp(-65.5) * evened(irfft(rfft(rng.standard_normal(N)) * colour, N))


def scene():
    """All the work at the bench, heard through the room; knocks and clacks have their own room settings."""
    strokes = travelling(cutting() + rasping() + judder() + sliding() + nudging() + leaning())
    knocks_heard = workshop(knocks(), tail_db=5.5, build_s=0.0011, echo_db=-8.0, wall_db=7.0)
    clacks_heard = workshop(clacks(), tail_db=-6.5, build_s=0.0025, echo_db=-5.0)
    return (strokes + knocks_heard + clacks_heard + quiet())[None]


def record(dry):
    """Band limit: linear-phase low-pass."""
    edge_hz = 15400
    low_pass = signal.firwin(801, edge_hz, window=("kaiser", 9), fs=SR)
    return signal.oaconvolve(dry, low_pass[None], "same")


dry = scene()
out = record(dry)
bounce(out)
```